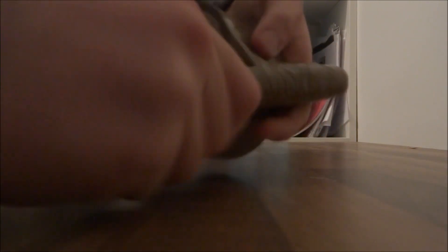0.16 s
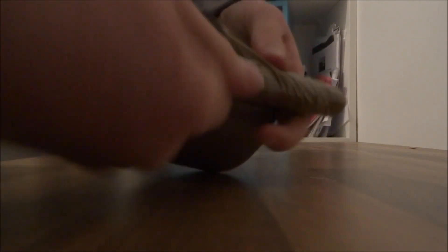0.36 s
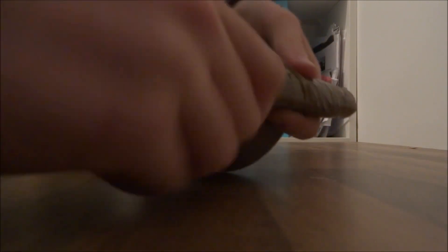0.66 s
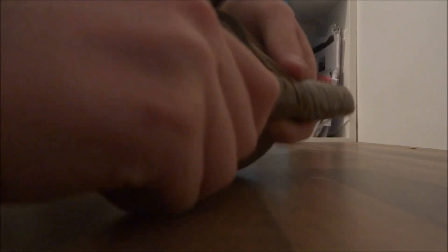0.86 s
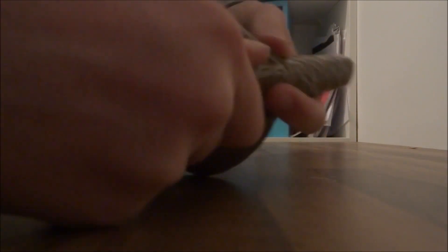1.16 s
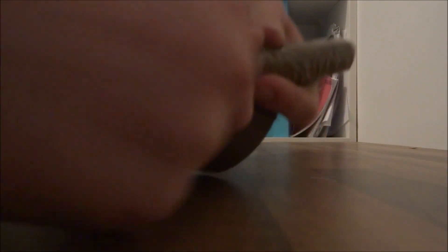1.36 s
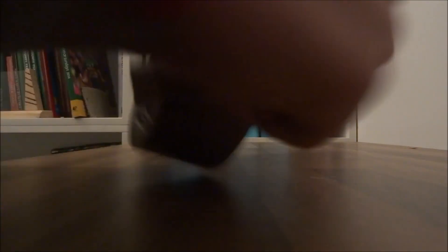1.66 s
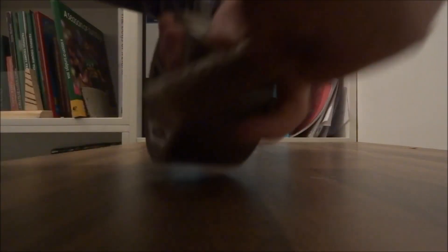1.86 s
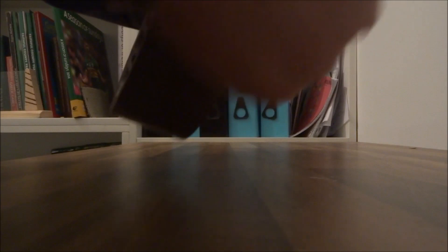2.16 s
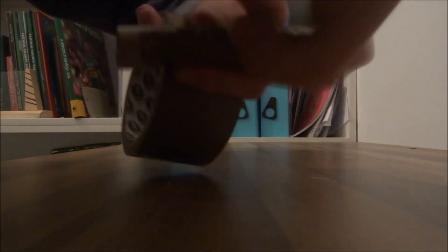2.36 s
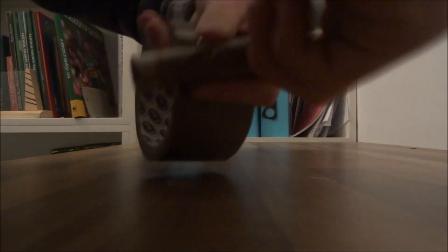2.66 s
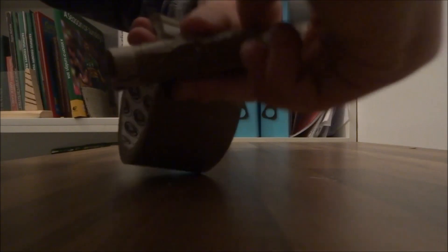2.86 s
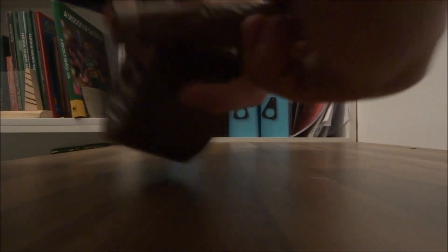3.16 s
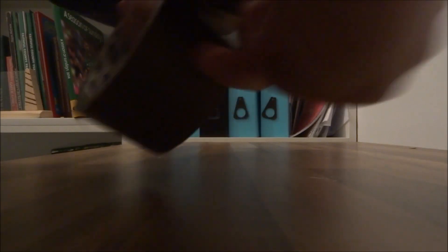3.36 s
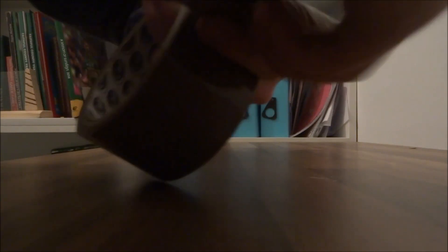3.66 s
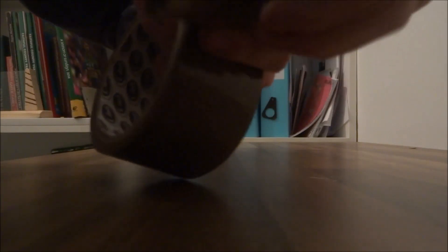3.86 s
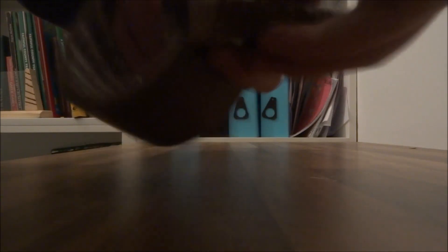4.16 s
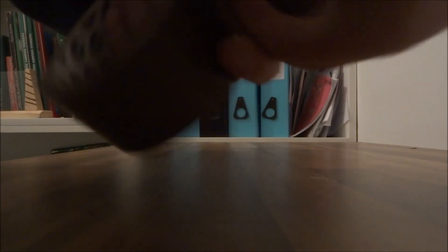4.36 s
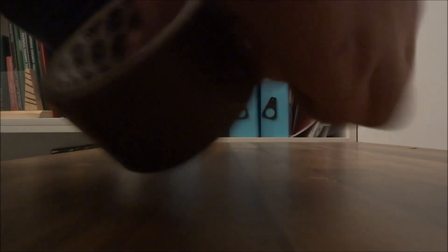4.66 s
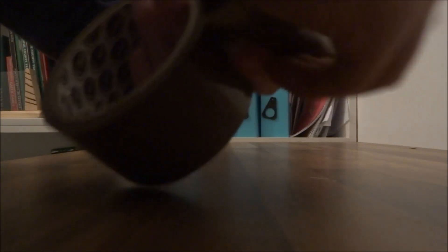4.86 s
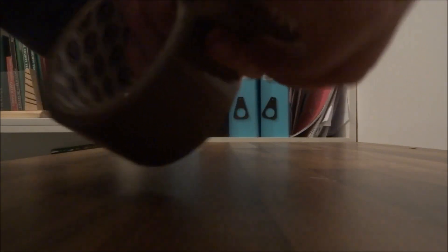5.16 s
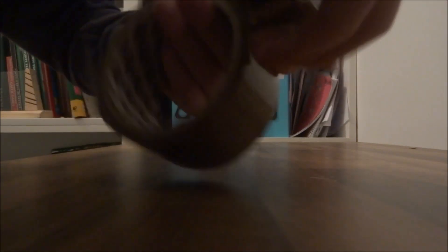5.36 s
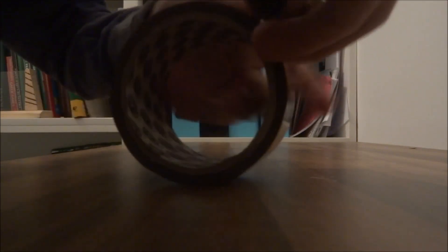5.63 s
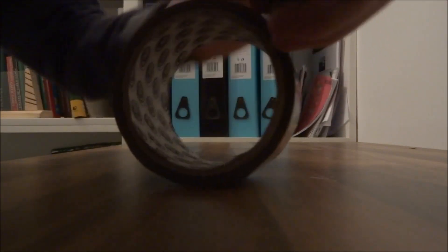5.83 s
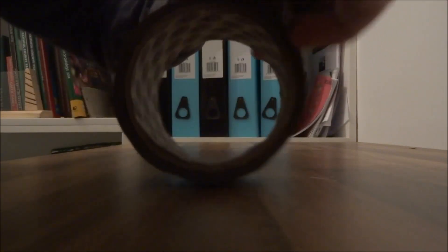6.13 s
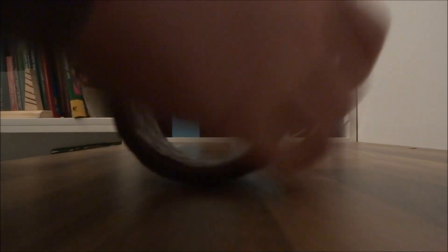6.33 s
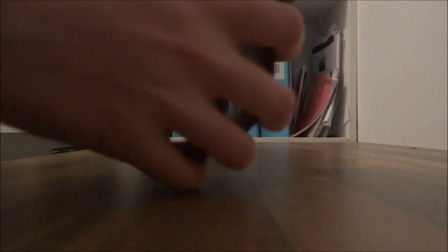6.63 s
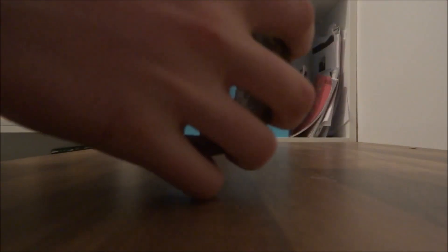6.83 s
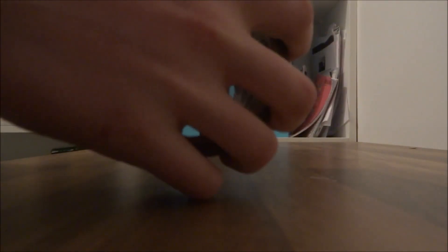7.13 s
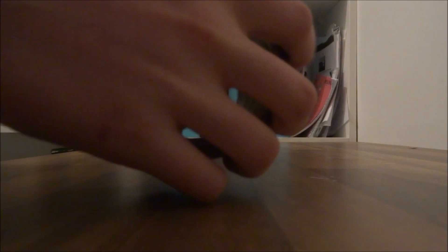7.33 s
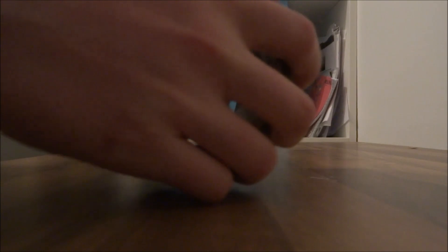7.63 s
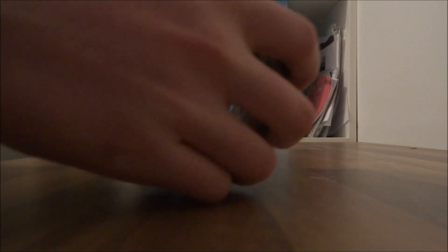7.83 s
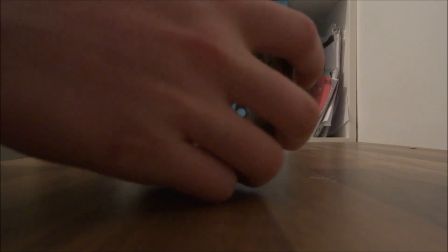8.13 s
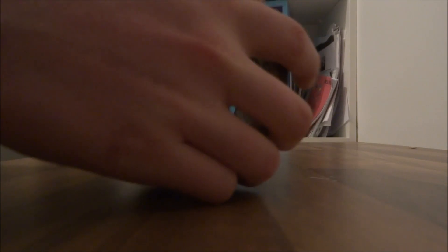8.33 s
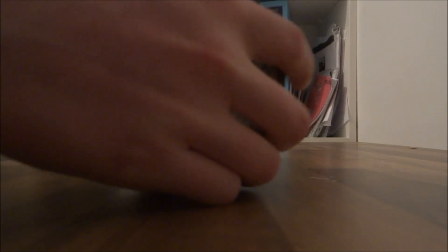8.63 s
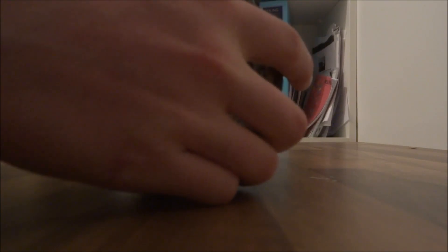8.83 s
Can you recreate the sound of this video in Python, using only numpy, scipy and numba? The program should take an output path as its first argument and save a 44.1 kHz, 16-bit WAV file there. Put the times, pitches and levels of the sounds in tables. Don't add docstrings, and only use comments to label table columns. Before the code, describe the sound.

A close microphone on a wooden table in a small hard room with very faint air. From 0 to 0.45 s packing tape tears in a dense volley of loud, bright cracks with fine crackle, then nearly stops. More snaps with flapping film and short hollow cardboard rings come around 0.8-1.1 and 1.8-2.1 s. After a lull, a stronger stroke at 2.9-3.4 s mixes cracks with dull tube taps; another runs 3.8-4.5 s over soft rubbing of fingers and roll. From 4.7 to 6.3 s snaps are sparser and the roll bumps the table, with a hard hollow knock near 5.6 and a deep thump near 6.3. Sharp pops follow around 6.9 and 7.1 s, then scattered picking snaps and crackle, thickening from 7.4 to 7.8 and 8.5 to 8.9 s. Loud cracks are abruptly limited, their short room echoes swelling behind.

```python
import sys
import numpy as np
from scipy import signal
from scipy.fft import rfft, irfft
from scipy.io import wavfile
from scipy.ndimage import minimum_filter1d
from numba import njit

SR = 44100
rng = np.random.default_rng(int(sys.argv[2]) if len(sys.argv) > 2 else 0)


def boost_factor(decibels):
    exponent = np.asarray(decibels, float) / 20
    return 10 ** exponent


def wrap_up_sound(samples):
    columns = np.atleast_2d(samples).T
    tamed = np.clip(columns, -1, 1)
    steps = np.round(tamed * 32767).astype(np.int16)
    wavfile.write(sys.argv[1], SR, steps)


N = 396459


def unit_rms(x):
    return x / np.sqrt(np.mean(x ** 2))


def colour(x, points):
    hz, db = np.transpose(points)
    f = np.maximum(np.fft.rfftfreq(x.shape[-1], 1 / SR), 1)
    gain = boost_factor(np.interp(np.log(f), np.log(hz), db))
    return unit_rms(irfft(rfft(x) * gain, x.shape[-1]))


def band(x, low_hz, high_hz):
    return unit_rms(signal.sosfilt(signal.butter(2, [low_hz, high_hz], "band", fs=SR, output="sos"), x))


def thin(x, low_hz):
    return signal.sosfilt(signal.butter(4, low_hz, "high", fs=SR, output="sos"), x)


def decay(t, t60):
    return np.exp(-np.log(1000) * t / t60)


def ring(hz, t60, size):
    t = np.arange(size) / SR
    return np.sin(2 * np.pi * np.outer(hz, t)) * decay(t, t60)


def puffs(hz, width_hz, fade_s):
    size = 2048
    t = np.arange(size) / SR
    rows = rng.standard_normal((len(hz), size)) * np.exp(-t / fade_s)
    away = (np.fft.rfftfreq(2 * size, 1 / SR) - hz[:, None]) / width_hz
    parts = rfft(rows, 2 * size)
    parts /= np.abs(parts) ** .75
    rows = irfft(parts / (1 + 1j * away) ** 2)[:, :size] * np.exp(-t / (6 * fade_s))
    return rows / np.abs(rows).max(axis=1, keepdims=True)


def place(times, rows):
    out = np.zeros(N + rows.shape[1])
    for s, row in zip(times, rows):
        i = int(max(s, 0) * SR)
        out[i:i + len(row)] += row
    return out[:N]


def over_time(table):
    return np.interp(np.arange(N) / SR, *np.transpose(table))


# frequency in Hz, level in dB per Hz.
HUSH = [(18, -31), (30, 10), (248, -4), (368, 6.5), (577, -8), (1420, 7), (2670, -4), (4900, -6.5),
        (14800, -32), (16500, -35)]


def hush():
    mid, side = boost_factor(-58) * colour(rng.standard_normal((2, N)), HUSH)
    return mid, boost_factor(6.5) * thin(side, 190)


# delay in seconds, level in dB.
ECHOES = [
    (.00112, -8),
    (.0046, -19),
    (.00915, -10),
    (.0134, -18),
    (.0215, -21),
]
# frequency in Hz, t60 in seconds.
ROOM_T60 = [(300, 0.39), (1200, 0.24), (4000, 0.33), (9000, 0.24), (14000, 0.25)]


def room():
    tail_db, side_db, build_up_s = -9, -15, 0.0039
    t = np.arange(32768) / SR
    hz, t60 = np.transpose(ROOM_T60)
    tail = 0
    for centre_hz in 150 * 2. ** np.arange(0, 7, .5):
        t60_s = np.interp(np.log(centre_hz), np.log(hz), t60)
        noise = band(rng.standard_normal((2, len(t))), centre_hz / 0.97, min(centre_hz * 1.486, 20000))
        tail = tail + np.sqrt(centre_hz) * noise * decay(t, t60_s)
    tail = tail * np.minimum(t / build_up_s, 1)
    tail = boost_factor(tail_db) * tail / np.sqrt(np.sum(tail[0] ** 2)) * np.array([[1], [boost_factor(side_db)]])
    tail[0, 0] = 1
    for s, db in ECHOES:
        tail[:, int(s * SR)] += boost_factor(db) * np.array([1, boost_factor(-10)])
    return tail


# start in seconds, table boom peak in dB, knock in dB relative to boom.
BUMPS = [(0.298, -41, 21), (0.752, -47, -26), (1.099, -40, 6), (1.695, -28, 2), (2.349, -59, 24),
         (2.852, -48, -15), (3.712, -39, 0), (3.949, -34, -5), (4.73, -27, 7.5), (4.872, -24.5, 1),
         (5.468, -32.5, 0), (5.584, -18, 17), (5.717, -35, -10), (5.843, -31.5, 6.5), (5.891, -32.5, 5),
         (6.033, -29.5, 13), (6.278, -17, -0.5), (6.9, -46, 8), (7.354, -52, 6), (7.733, -41, 14),
         (8.182, -46, 1), (8.499, -53, 10), (8.899, -49, -16)]
# frequency in Hz, level in dB, t60 in seconds.
BOOM = [(49.24, 4.5, 0.96), (77.5, 7, 0.16), (93.4, 8.5, 0.15), (181, 10.5, 0.071)]
# frequency in Hz, level in dB, t60 in seconds.
KNOCK = [(387, -5, 0.17), (522, -4, 0.059), (620, -23, 0.16), (960, -14, 0.034), (1225, -4, 0.023)]


def struck(modes, count):
    rows = 0
    for hz, db, t60 in modes:
        rows = rows + boost_factor(db) * ring(hz * (1 + 0.013 * rng.standard_normal(count)), t60, SR)
    return rows


def bumps():
    s, boom_db, knock_db = np.transpose(BUMPS)
    swell = np.minimum(np.arange(SR) / SR / 0.009, 1)
    boom = swell * struck(BOOM, len(s))
    knock = boost_factor(knock_db)[:, None] * struck(KNOCK, len(s))
    return place(s + 0.00724, boost_factor(boom_db - 11)[:, None] * (boom + knock))


# time in seconds, rub level in dB.
GRIP = [(0, -68), (.4, -75), (.75, -86), (1.2, -55.5), (1.5, -70), (1.72, -53), (2.3, -55.5), (2.6, -74),
        (3.1, -45.5), (3.6, -51), (4.2, -42.5), (5.2, -53.5), (5.32, -43), (5.75, -43.5), (6.2, -54.5),
        (7.25, -60.5), (7.6, -58), (8.99, -64.5)]


def rub():
    fits = boost_factor(3 * band(rng.standard_normal(N), 3, 40))
    noise = fits * rng.standard_normal(N)
    roll = boost_factor(-9) * band(noise, 350, 410) + boost_factor(-1.5) * band(noise, 464, 685)
    table = boost_factor(-9.5) * band(noise, 82, 194)
    skin = boost_factor(2.5) * band(noise, 340, 2460)
    return boost_factor(over_time(GRIP) - 5.5) * (roll + table + skin)


# start in seconds, peak in dB, ring in Hz.
TAPS = [(0.564, -40, 1380), (0.584, -29.5, 1370), (0.76, -70, 367), (1.581, -42, 1510), (1.663, -39, 1450),
        (2.253, -27, 2160), (2.727, -39.5, 298), (3.145, -16.5, 1183), (3.396, -13.5, 2250),
        (3.447, -23.5, 620), (3.485, -34, 1000), (4.609, -42, 586), (4.689, -24.5, 1930), (4.719, -61, 500),
        (5.166, -37, 1040), (5.508, -21.5, 545), (7.525, -16.5, 1305), (4.888, -17, 957),
        (8.188, -29.5, 665), (8.364, -34, 1180), (8.261, -41, 910)]


def taps():
    s, db, hz = np.transpose(TAPS)
    onset = np.minimum(np.arange(4096) / SR / .0015, 1)
    return place(s, boost_factor(db)[:, None] * ring(hz, .028, 4096) * onset)


# time in seconds, crackle level in dB.
PEEL = [(0, -42.5), (.45, -24.5), (.7, -69.5), (.95, -35), (1.2, -48), (1.55, -59.5), (2.0, -44),
        (2.7, -52), (3.05, -32), (3.4, -41), (3.85, -54), (4.6, -51), (4.9, -36), (5.25, -43.5),
        (5.95, -45.5), (6.3, -35), (8.15, -42.5), (8.99, -36.5)]
# frequency in Hz, level in dB per Hz.
FILM = [(880, -52), (1500, 0), (2450, -10.5), (3090, 12.5), (4520, 5.5), (11600, 10), (15100, 6),
        (16500, -67)]


def crackle(tear):
    per_s, spread_db = 1300, 3.8
    broken, sign, size = rng.random((3, N))
    ticks = (broken < per_s / SR) * np.sign(sign - .5) * boost_factor(-spread_db * np.log(size + 6e-3))
    gain = boost_factor(over_time(PEEL) - 2.5) + tear
    return thin(gain * (colour(ticks, FILM) + boost_factor(-19) * band(ticks, 1146, 1516)), 600)


# start in seconds, peak in dB.
WRAP_DRY = [(.1858, 19), (.2064, 7), (.2135, -3), (.3195, 13), (1.003, -16), (1.8296, -31), (1.8743, -2),
            (1.8962, -29), (1.913, -12), (2.4958, -11), (2.7192, -22), (2.9632, -18), (3.4068, -9.5),
            (3.6549, -5), (3.9242, -6), (4.006, 0), (4.275, 11.5), (4.3733, 16), (4.5046, -4.5)]
# start in seconds, peak in dB, film in Hz.
WRAP_FLAPS = [(.077, -37, 4300), (.108, 11.5, 5050), (.1775, 19, 3260), (.194, 12, 4840),
              (.2194, 13.5, 4430), (.2944, 22, 4380), (.3104, 11, 4250), (.8342, -29, 4030),
              (1.0697, 6.5, 4400), (1.3722, -33, 3020), (1.778, -8, 4200), (1.8473, -8, 3960),
              (1.8505, -6, 4180), (1.8763, -12, 3900), (1.8806, 4, 3800), (2.1117, 14, 3860),
              (3.0223, -4, 3900), (3.8037, -10, 3430), (4.0129, -15, 5100), (4.3803, 12, 3200)]
# start in seconds, peak in dB, film in Hz.
WRAP_HOLLOW = [(.305, 8, 4340), (.3378, -13, 4240), (.362, -15, 4370), (.367, 13, 4000), (.398, 4, 5030),
               (.8678, 0.5, 4220), (.9853, 13.5, 3380), (1.0987, 11, 3700), (1.2695, -24, 3140),
               (1.4168, -6.5, 4380), (1.9877, 8.5, 3880), (2.0143, 5, 5000), (2.0284, 0.5, 3660),
               (2.0603, 9.5, 3020), (2.3678, 4, 2570), (2.5333, -23.5, 3900), (2.9509, 8, 2940),
               (3.0047, 3, 3750), (3.0286, 19, 3780), (3.0978, -13, 3400), (3.2444, 23.5, 2770),
               (3.554, -15, 3100), (3.5935, -16.5, 3850), (3.6186, -7, 3350), (3.69, -20, 3120),
               (4.0804, 10, 3150), (4.1805, 18, 3160), (4.2394, 22, 3050), (4.3527, 10, 3460)]
# start in seconds, peak in dB, film in Hz.
WRAP_TUGS = [(.3414, 7, 4800), (.4267, -5.5, 4030), (.825, -35, 2380), (1.815, -22, 4400),
             (1.8382, -13, 3160), (2.3533, -23, 2260), (2.53, -30, 2840), (2.908, -7, 2900),
             (3.226, -5, 4060), (3.2634, 15, 3450), (3.3278, 4, 2730), (3.335, -32, 2750),
             (3.5233, -12, 3000), (3.5327, -35, 2870), (3.5445, -20, 3000), (3.8516, -26, 2820),
             (3.8753, -13, 3150), (3.9494, -20, 4040), (3.9798, -17, 3100), (4.0007, -11.5, 4600),
             (4.0303, -2, 3100), (4.055, -6.5, 4860), (4.1461, -15.5, 3730), (4.269, -15, 3200),
             (4.555, -18, 1900), (4.5698, -17.5, 1960), (4.5931, -22, 2000), (4.6352, -35, 2000)]
# start in seconds, peak in dB.
PICK_DRY = [(5.015, 11), (5.2065, -7.5), (5.8715, -6), (6.1372, -1), (6.2806, 10), (7.0544, -14),
            (7.2436, -21), (7.2848, -17.5), (7.3779, 13), (7.395, -22), (7.4562, -7.5), (7.6114, -12),
            (7.6266, -12), (7.6505, 11), (7.684, 13), (7.7238, 22.5), (7.827, -15), (8.0691, -0.5),
            (8.244, -5), (8.3438, -10), (8.401, -20), (8.447, -8), (8.4806, -6), (8.4928, 14.5),
            (8.5712, -.5), (8.704, 19), (8.7516, 13), (8.8279, 17.5)]
# start in seconds, peak in dB, film in Hz.
PICK_FLAPS = [(4.776, -10, 3540), (4.798, -13, 2200), (4.97, 19.5, 3160), (5.5601, -8, 3420),
              (5.7226, -28, 5060), (6.1656, -9.5, 5470), (6.5311, -7, 3600), (6.6452, -17, 3600),
              (6.657, -2.5, 3480), (6.7638, -16, 5530), (7.591, -7.5, 5500), (7.6013, 0, 5230),
              (7.7902, -24, 4500), (7.7984, 13, 5100), (8.0002, -24, 5000), (8.0506, -33, 5030),
              (8.0577, -7.5, 3840), (8.1795, -1, 4700), (8.6842, -10, 5250), (6.3555, 20, 5260),
              (6.3758, 0, 3500), (7.0757, 15.5, 3870), (7.8107, -6, 3960), (5.912, -26, 3050),
              (8.694, -20, 4660), (8.4838, 14.5, 4300)]
# start in seconds, peak in dB, film in Hz.
PICK_HOLLOW = [(4.6505, -1.5, 2400), (4.7589, 8, 3300), (4.7867, 0, 1790), (4.8087, -3.5, 2030),
               (4.883, -7, 2030), (5.542, 5.5, 3630), (5.623, -7.5, 2900), (5.646, -13.5, 2080),
               (5.7084, -3, 2460), (5.7416, -4, 3080), (5.8523, -11, 2540), (5.51, -20.5, 2120),
               (5.84, -20, 1900), (6.8498, 20.5, 2220), (6.8885, 23, 4900), (6.9117, 7, 4960),
               (7.37, -8.5, 3140), (7.5234, -9, 3320), (7.9554, -10, 3260), (7.98, -39, 3200),
               (8.1861, -8.5, 4070), (8.32, -27, 5000), (8.4175, -19, 5200)]
# start in seconds, peak in dB, film in Hz.
SLAPS = [(.0441, -10, 4200), (1.7648, -20.5, 3250), (1.771, -9.5, 3280), (2.894, -12.5, 3180),
         (6.0478, -4.5, 3310), (6.2187, -5, 3560), (6.272, 1, 3500), (8.075, -13, 5100)]
# time in seconds, ring in Hz, lower ring in dB.
TUBE = [(0, 1283, -63), (2.5, 1317, -17), (3.1, 1135, -27.5), (4.1, 1110, -10.5), (4.9, 1025, -20.5),
        (5.8, 1080, 1.5), (6.5, 1230, -5), (7.0, 1335, -25), (8.99, 1290, 2)]


def snaps():
    # events, crack centre Hz, tube dB, film dB under a crack of 0 dB
    kinds = [(WRAP_DRY, 9700, -37, -27), (WRAP_FLAPS, 9160, -31.5, -6.5), (WRAP_HOLLOW, 9700, -22, -7.5),
             (WRAP_TUGS, 8200, -12, -1), (PICK_DRY, 11350, -42, -70), (PICK_FLAPS, 11030, -35, -7.5),
             (PICK_HOLLOW, 9300, -21, -9), (SLAPS, 9500, -37, 2.8)]
    dry_film_hz = 4200
    tube_growth, film_growth = 0.91, 0.91
    events = []
    for rows, *kind in kinds:
        for row in rows:
            events.append((*row, dry_film_hz)[:3] + tuple(kind))
    s, crack_db, film_hz, crack_hz, tube_db, film_db = np.transpose(events)
    crack_chance, tube_chance = rng.standard_normal((2, len(s)))

    crack = puffs(crack_hz + 1500 * crack_chance, 6500, .0007)
    film = puffs(film_hz, 600, .0013)
    at, ring_hz, lower_db = np.transpose(TUBE)
    tube_hz = np.interp(s, at, ring_hz) * (1 + .05 * tube_chance)
    lower_gain = boost_factor(np.interp(s, at, lower_db))[:, None]
    tube = puffs(tube_hz, 160, .003)
    tube = tube + lower_gain * puffs(0.474 * tube_hz, 110, .003)

    bright = place(s, boost_factor(crack_db + 2.5)[:, None] * crack)
    flap = place(s, boost_factor(film_growth * crack_db + film_db)[:, None] * film)
    hollow = place(s, boost_factor(tube_growth * crack_db + tube_db)[:, None] * tube)
    tear = place(s, boost_factor(1.58 * crack_db - 26.5)[:, None] * np.exp(-np.arange(4096) / SR / 0.003))
    return thin(bright, 2000) + thin(flap, 1500) + thin(hollow, 450), tear


def scene():
    lean_db = -1
    thumps = bumps()
    cracks, tear = snaps()
    air = cracks + taps() + crackle(tear) + rub() + boost_factor(-8) * thin(thumps, 170)
    mid, side = signal.fftconvolve(air[None], room(), axes=1)[:, :N]
    hush_mid, hush_side = hush()
    mid, side = mid + hush_mid, side + hush_side
    left = (mid + side) * boost_factor(lean_db / 2) + thumps
    right = (mid - side) * boost_factor(-lean_db / 2) + thumps
    return np.array([left, right])


@njit
def follow(peak, attack, release):
    e, out = 0., np.empty(len(peak))
    for i in range(len(peak)):
        e += (peak[i] - e) * (attack if peak[i] > e else release)
        out[i] = e
    return out


def limiter(x):
    attack_s, release_s, threshold_db, strength = 0.0016, 0.006, -3.0, .88
    ahead = -minimum_filter1d(-np.abs(x).max(axis=0), size=101, origin=-50)
    seen = follow(ahead, 1 / (attack_s * SR), 1 / (release_s * SR))
    return x * np.minimum(boost_factor(threshold_db) / (seen + 1e-9), 1) ** strength


def band_limit(x):
    return signal.sosfilt(signal.butter(12, 16970, fs=SR, output="sos"), x)


def record(dry):
    top_cut = signal.ellip(6, .3, 40, 15900, fs=SR, output="sos")
    mix = np.clip(signal.sosfilt(top_cut, limiter(dry)), -1, 1)
    return band_limit(mix)


dry = scene()
out = record(dry)
wrap_up_sound(out)
```